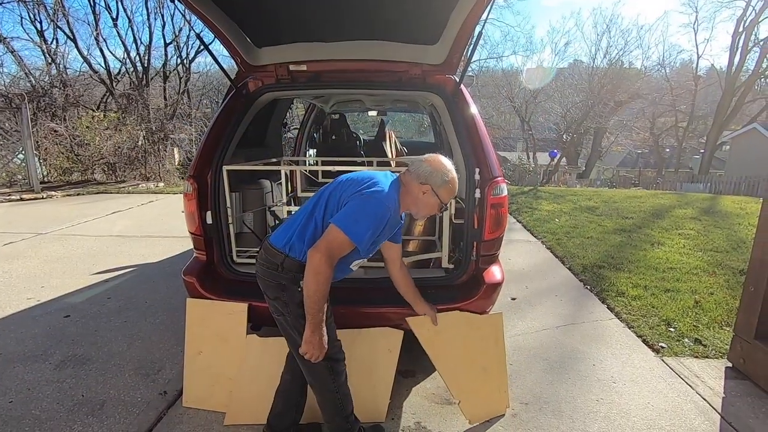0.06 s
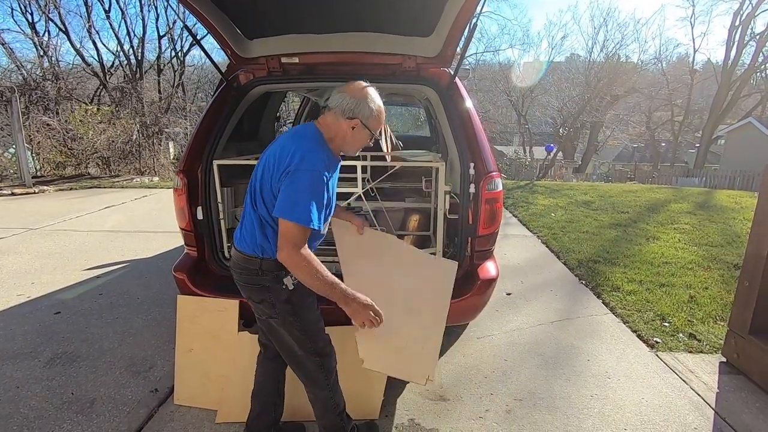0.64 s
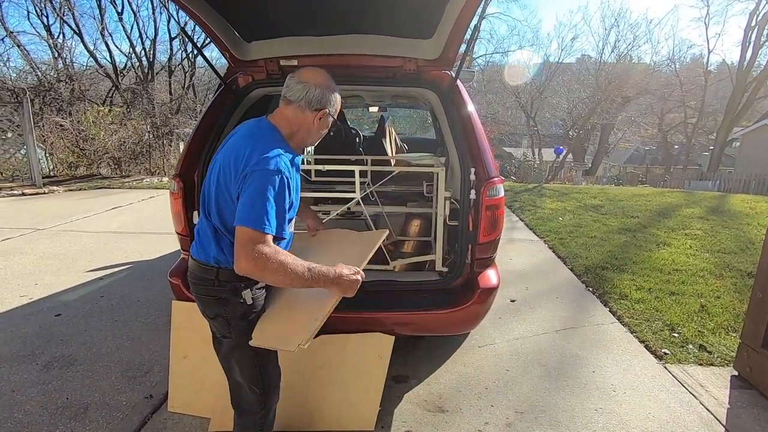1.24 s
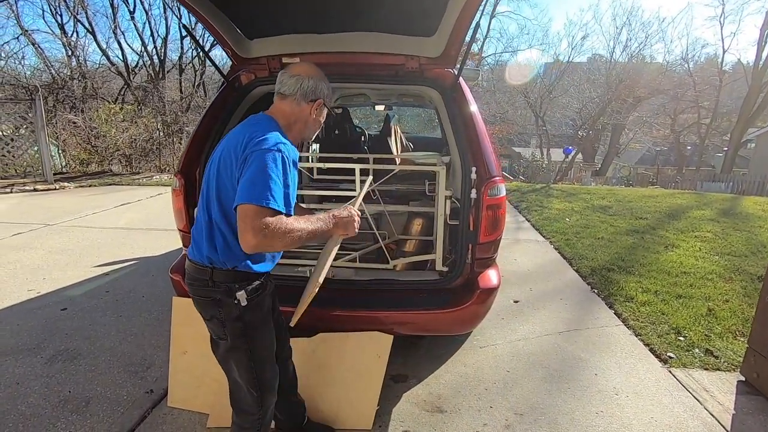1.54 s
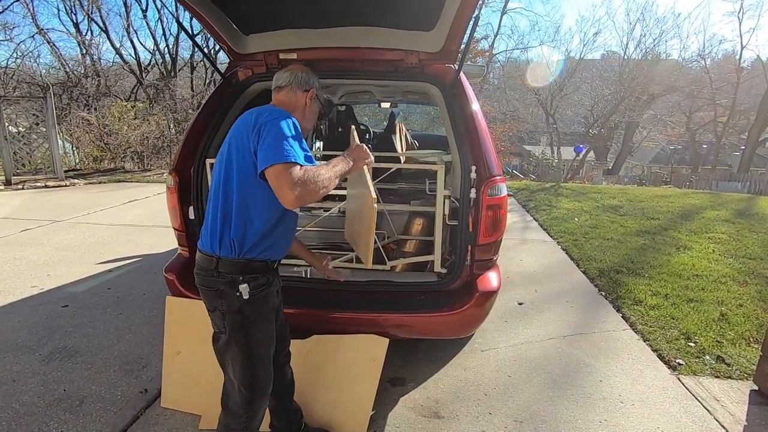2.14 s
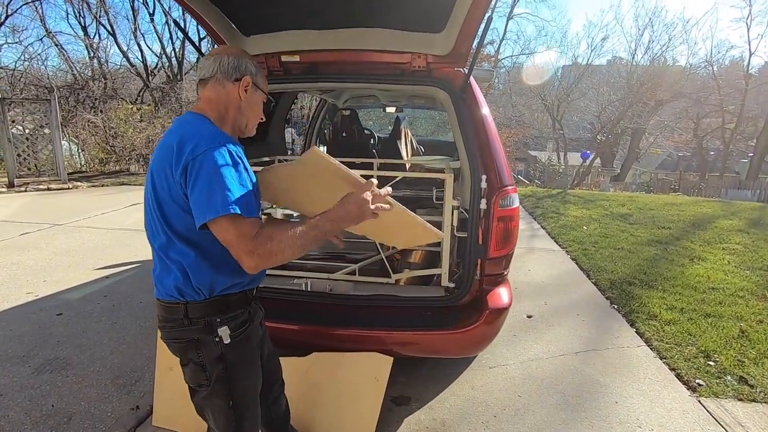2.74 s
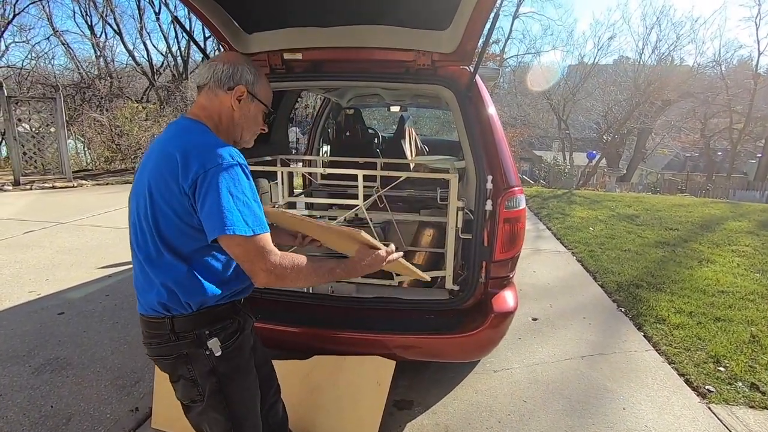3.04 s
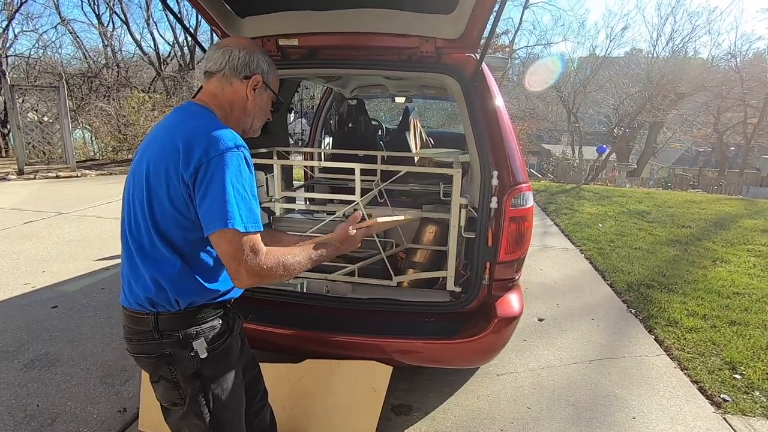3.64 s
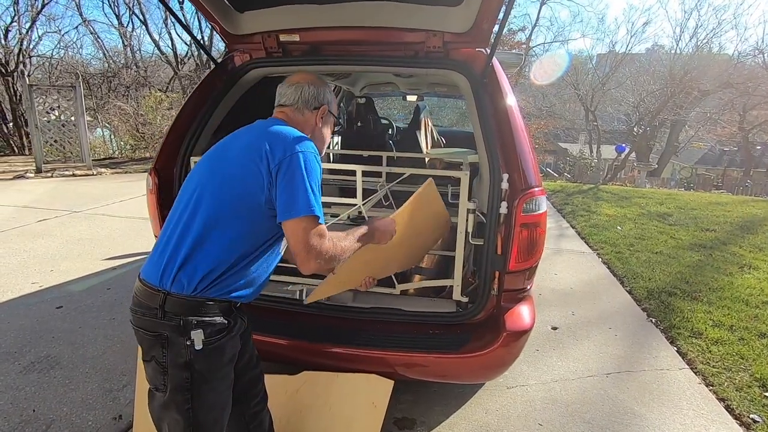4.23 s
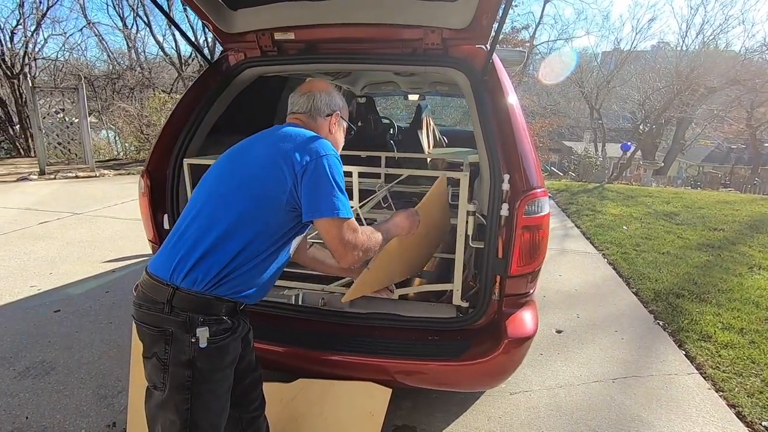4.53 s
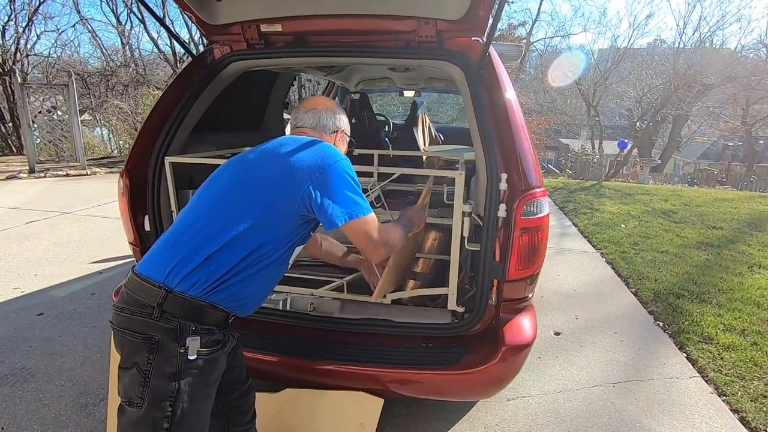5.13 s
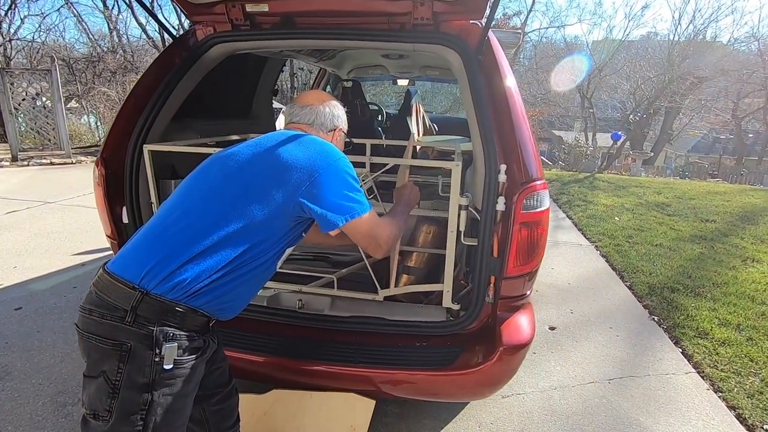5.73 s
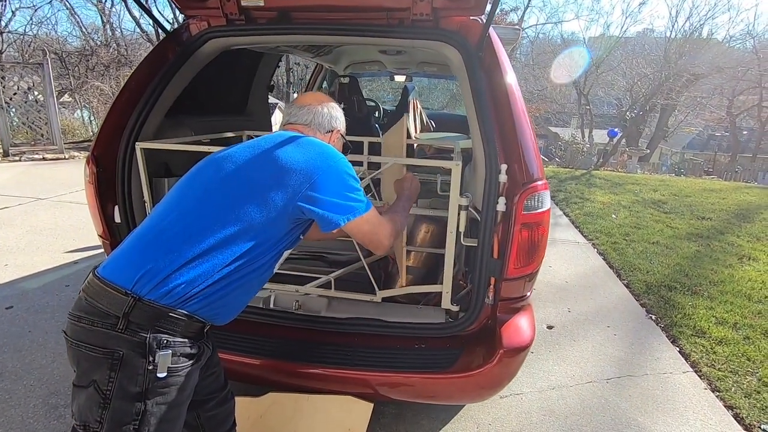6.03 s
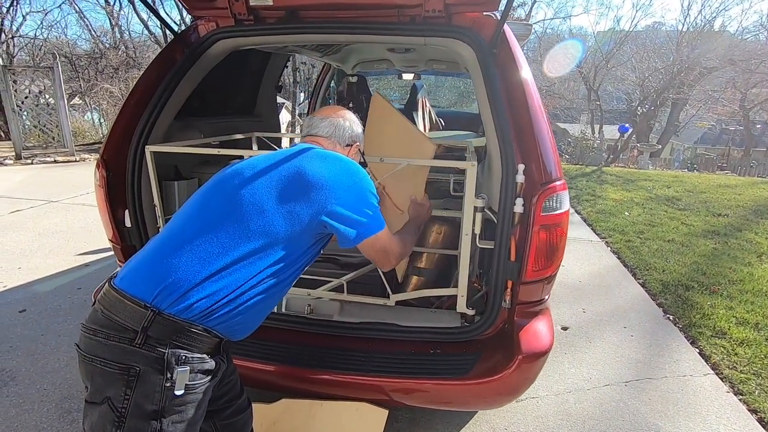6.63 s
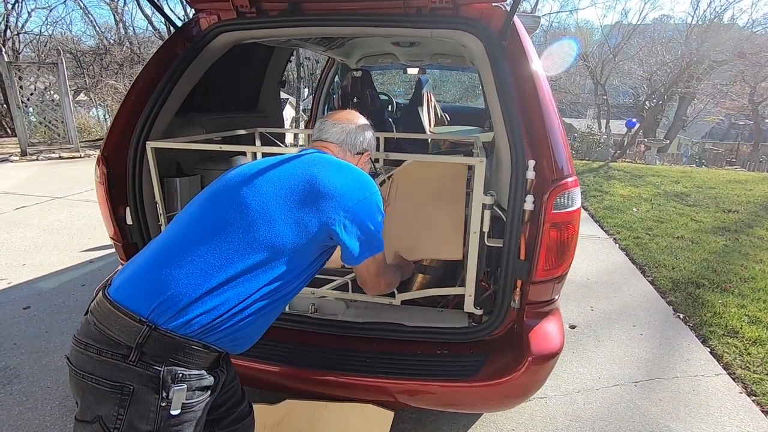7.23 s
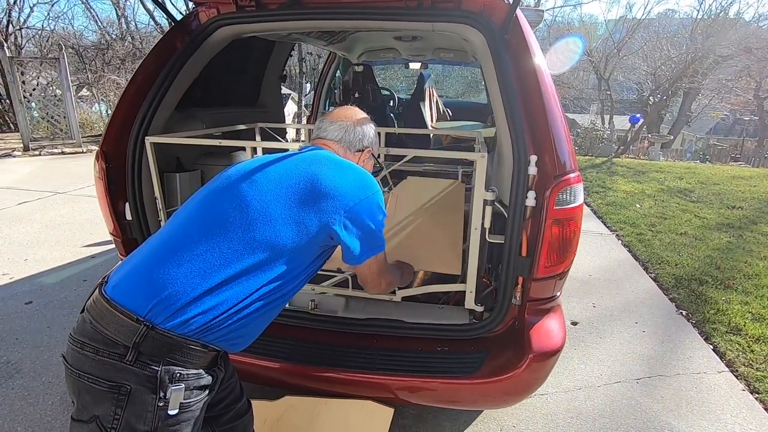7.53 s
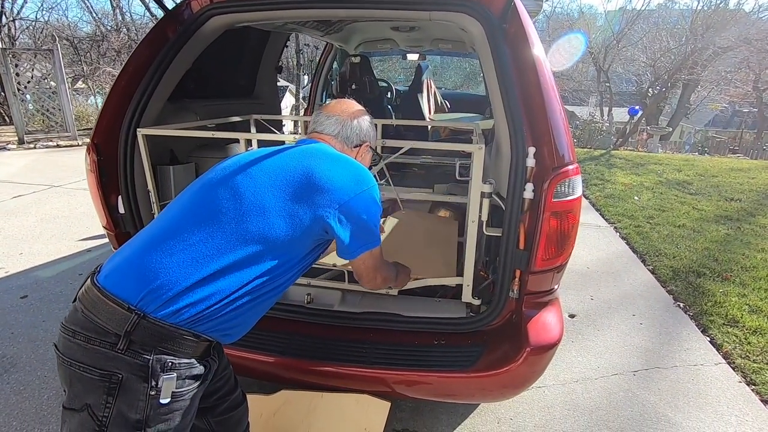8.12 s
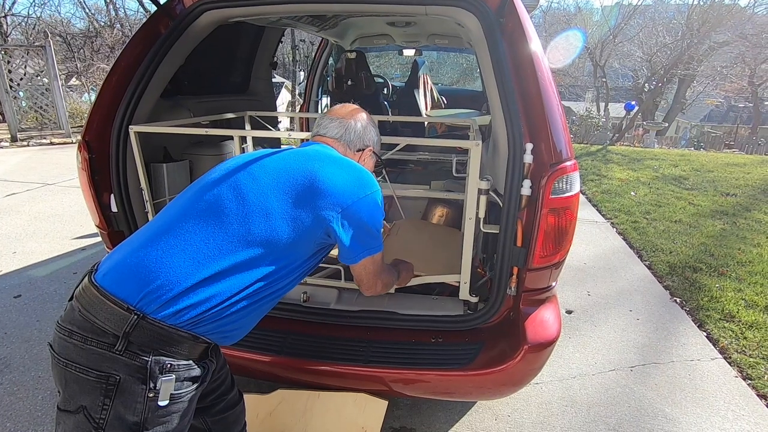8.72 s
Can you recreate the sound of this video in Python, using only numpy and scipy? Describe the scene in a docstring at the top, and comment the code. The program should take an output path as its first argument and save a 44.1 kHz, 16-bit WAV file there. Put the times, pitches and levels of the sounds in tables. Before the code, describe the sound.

On a quiet driveway, a plywood panel is lifted with a few hollow knocks. Palms rub over the wood while shoes scuff and crunch grit on concrete. The panel then goes into the back of a van, thumping with a low boom, squeaking and scraping along a metal rack whose tubes ring briefly. The hardest knocks come near the end. Everything is heard from straight ahead, over a faint outdoor rumble and hush.

```python
"""On a quiet driveway a plywood panel is lifted with a few hollow knocks and turned in the hands:
palms rub over the grain, shoes scuff and crack grit on the concrete. From about 4.6 s it is in the
back of a van, where each thump sets the cargo floor booming. Near 6 s its edge squeaks and judders
on the rack, then scrapes along in pushes while the panel hums and the metal tubes ring. The hardest
knocks land just after 8 s as it goes into place. A low rumble and a far hush lie under it all."""
import sys
import numpy as np
from scipy import signal
from scipy.fft import rfft, irfft, next_fast_len
from scipy.io import wavfile

SR = 44100
rng = np.random.default_rng(int(sys.argv[2]) if len(sys.argv) > 2 else 0)


def master(y):
    """Save y as 16-bit WAV."""
    cut = np.clip(np.atleast_2d(y).T, -1, 1)
    pcm = np.round(cut * 32767)  # scale
    wavfile.write(sys.argv[1], SR, pcm.astype(np.int16))


N = 395577

# knocks on the panel: t/s, chatter decay/s, clack level/dB, clack f/Hz,
# clack flank slope/(dB per octave), thump level/dB, thump f/Hz
KNOCKS = [(.014, 0.0046, -50, 700, 10, -39, 190), (.066, 0.0069, -48, 1700, 4.5, -49.5, 220),
          (0.441, 0.006, -61, 3500, 9, -48, 121), (.484, 0.0024, -70, 1200, 13, -48.5, 192),
          (0.874, 0.022, -54, 2200, 4.5, -48, 217), (1.036, 0.0023, -52, 1200, 6, -40, 224),
          (1.055, 0.0088, -55, 2200, 7, -45.5, 370), (1.613, 0.0016, -72, 1500, 4, -49, 216),
          (3.672, 0.0022, -55.5, 3600, 4.5, -66, 300), (4.689, 0.0046, -52.5, 850, 9.5, -39, 232),
          (4.759, 0.012, -51.5, 750, 10, -47.5, 261), (4.973, 0.013, -60, 1700, 10, -58, 240),
          (6.025, 0.012, -53.5, 900, 3, -38.5, 253), (6.056, 0.029, -51.5, 600, 16, -36, 186),
          (6.446, 0.005, -44.5, 1050, 8.5, -40, 220), (6.465, 0.019, -49.5, 700, 12.5, -39, 180),
          (6.667, 0.0086, -48, 700, 10.5, -48.5, 201), (6.74, 0.0035, -45.5, 1100, 14.5, -50, 221),
          (6.96, 0.0024, -43, 2400, 11, -67.5, 200), (7.051, 0.0039, -44, 3300, 8.5, -59.5, 204),
          (7.531, 0.027, -54, 1000, 2.5, -50, 177), (7.575, 0.015, -56, 1500, 1.5, -50, 239),
          (8.077, 0.00041, -30.5, 1234, 19.5, -33, 170), (8.096, 0.0049, -33, 1200, 11, -32.5, 186),
          (8.384, 0.0017, -34.5, 950, 29, -31, 204), (8.68, 0.006, -49.5, 690, 12.5, -38, 272),
          (8.752, 0.005, -50.5, 700, 9, -37.5, 214), (8.906, 0.011, -53.5, 650, 11.5, -40, 190)]
# modes of the panel resting in the rack: f/Hz, level/dB, t60/s
PANEL_MODES = [(150.2, -1, 0.15), (182.4, -13, 0.47), (242.6, -6.5, 0.36), (288.3, -7.5, 0.48),
               (550, -12.5, 0.11), (617.6, 4.5, 0.22), (766.3, -3, 0.2), (850, -11.5, 0.21),
               (930, -9.5, 0.17), (1059, 3.5, 0.18), (1131.6, 12, 0.1), (1280, 7.5, 0.17), (1450, -6, 0.18),
               (1776, 4, 0.15), (2496, -1, 0.045), (3260, -3.5, 0.12)]
# stereo width of scattered sound: f/Hz, side minus mid/dB
STEREO_WIDTH = [(100, -31.5), (280, -22.5), (400, -14), (700, -6), (1300, -5), (2400, -8.5), (4400, -13),
                (8100, 0.5)]
# spectra of the bass rumble and of the sub-bass below it: f/Hz, level/dB
RUMBLE_COLOUR = [(60, -1), (100, 0.5), (155, 9.5), (240, 2.5), (300, -5), (400, -8.5), (700, -35.5)]
SUB_COLOUR = [(20, -32), (35, -3.5), (55, 11.5), (80, 22), (105, 6.5), (160, -75)]


def panel_response(direct_db=45.0, crack_db=8.5, crack_s=0.001, cabin_db=8.5, cabin_t60=0.48):
    """One tap on the panel: a crack, the cargo space's dull tail, dense vibrations and ringing modes."""
    wood = [(83.6, 4, 0.19), (163, 24, 0.1), (272, 14.5, 0.4), (415, 11.5, 0.73), (750, 15, 0.5),
            (2260, 17, 0.13), (5100, 9, 0.23), (8900, -23.5, 0.13), (13000, -32.5, 0.12)]   # dense short-lived vibrations: f/Hz, level/dB, t60/s
    size = 24000
    t = np.arange(size) / SR
    cabin = lowpass(diffuse(size), hz=6000) * from_db(cabin_db - 60 * t / cabin_t60)
    tap = diffuse(size) * from_db(crack_db) * np.exp(-t / crack_s) + cabin
    tap[:, 0] += from_db(direct_db)
    out = lowpass(tap, hz=2330)   # soft wood rounds the pulse off
    edges_hz = np.geomspace(70, 16000, 14)
    noises = [diffuse(size), diffuse(size)]
    for k, (low, high) in enumerate(zip(edges_hz, edges_hz[1:])):
        hz = np.sqrt(low * high)
        decay = from_db(at_hz(wood, hz) - 60 * t / at_hz(wood, hz, column=2))
        out += band(noises[k % 2], low, high) * decay
    for hz, db, t60 in PANEL_MODES:
        # reflections bring each mode to the two ears slightly out of step
        skew = np.arctan(from_db(at_hz(STEREO_WIDTH, hz))) * rng.choice([-1, 1]) * np.array([[1], [-1]])
        spot_db, grip = rng.normal(0, 0.67), rng.normal(1, .008)   # spot and grip shift each mode
        decay = from_db(db + spot_db - 60 * t / t60)
        out += rng.choice([-1, 1]) * decay * np.sin(2 * np.pi * hz * grip * t + skew)
    return out


def knocks(first_touch_db=9.5, thump_db_per_octave=21.0):
    """A first touch and a dying chatter; where the panel is struck sets the pitch of clack and thump."""
    edges_hz = [60, 125, 210, 325, 530, 900, 1500, 2400, 3800, 6000, 11000]   # band edges for shaping each knock: f/Hz
    scoop = [(260, -1), (415, -3.5), (700, 1), (3000, 0), (8000, -9.5)]   # hollow between thump and clack, softened top: f/Hz, level/dB
    out, t = np.zeros((2, N)), np.arange(24000) / SR
    spots = [panel_response() for _ in range(4)]
    blows = []
    for k, (_, chatter_s, *_) in enumerate(KNOCKS):
        age = t / chatter_s
        force = grains(per_s=2500, spread_db=6.56, size=len(t)) * np.exp(-age) * np.minimum(2 * age, 1)
        force[0] += from_db(first_touch_db)
        blows.append(through(force, spots[k % 4]))
    attack = int(.04 * SR)
    for low, high in zip(edges_hz, edges_hz[1:]):
        hz = np.sqrt(low * high)
        parts = band(np.array(blows), low, high, order=3)
        for part, (s, _, clack_db, clack_hz, slope, thump_db, thump_hz) in zip(parts, KNOCKS):
            clack = from_db(clack_db + bell(hz, clack_hz, slope))
            thump = from_db(thump_db + bell(hz, thump_hz, thump_db_per_octave))
            gain = np.hypot(clack, thump) * from_db(at_hz(scoop, hz))
            add(out, s, gain * part / part[:, :attack].std())
    return out


def floor_boom(in_van_s=4.6, swell_s=0.094, boom_db=-10.0, deep_db=-17.5):
    """The van's floor takes up each thump, swells and booms on at the panel's four lowest modes."""
    t, power = np.arange(0, N, 16) / SR, 0
    for s, *_, thump_db, _ in KNOCKS:
        if s > in_van_s:
            age = np.maximum(t - s, 0) / swell_s
            power += (from_db(thump_db) * age * np.exp(1 - age)) ** 2
    shake = colour(diffuse(N), RUMBLE_COLOUR)
    hollow = sum(rms_one(resonate(shake, hz, width_hz=14)) for hz, *_ in PANEL_MODES[:4])
    boom = from_db(boom_db) * rms_one(hollow) + from_db(deep_db) * noise_bed(SUB_COLOUR)
    return np.interp(np.arange(N) / SR, t, np.sqrt(power)) * boom


def ringing_tones(jitter=0.0065, sway=0.011, rough_db=5.0):
    """Single resonances swell and ring out: the panel's hollow hum, edge squeals, a ping from the rack."""
    tones = [(4.785, 0.058, 0.084, 279.2, -46), (6.042, 0.0062, .025, 274, -34),
             (6.748, 0.023, 0.016, 622, -39), (7.065, 0.003, 0.012, 1560, -41),
             (7.63, 0.018, 0.085, 300, -49.5), (8.245, .06, 0.033, 286.4, -38.5),
             (8.34, 0.098, 0.041, 1720, -54), (8.445, 0.019, 0.03, 285, -33), (8.555, .03, 0.054, 288, -43)]   # peak t/s, swell/s, ring-out/s, f/Hz, level/dB
    out, t = np.zeros(N), np.arange(N) / SR
    wavering_time = np.cumsum(1 + jitter * drift(150) + sway * drift(14)) / SR
    for s, swell_s, ring_s, hz, db in tones:
        near = (t > s - 3 * swell_s) & (t < s + 7 * ring_s)
        age = t[near] - s
        envelope = np.exp(-np.where(age < 0, (age / swell_s) ** 2, age / ring_s))
        out[near] += from_db(db) * envelope * np.sqrt(2) * np.sin(2 * np.pi * hz * wavering_time[near])
    return out * from_db(rough_db * np.tanh(drift(110)))


def edge_judder(slip_hz=60.1, wander=0.011, ring_s=0.0045, gain_db=2.5):
    """The edge sticks and slips on a rail, almost regularly, shaking the rack into a low groan."""
    pushes = [(6.14, 0.14, -43)]   # t/s, length/s, relative level/dB
    groan_colour = [(40, -27), (62, -9), (124, -11.5), (186, 14.5), (248, -13), (310, -3.5), (440, -29),
                    (900, -40)]   # f/Hz, level/dB
    turns = np.cumsum(slip_hz * (1 + wander * drift(30.4))) / SR
    slips = np.diff(np.floor(turns), prepend=0) * from_db(2.0 * drift(40))
    t = np.arange(4096) / SR
    modes = sum(from_db(db) * np.sin(2 * np.pi * hz * t) for hz, db, _ in PANEL_MODES)
    groan = signal.fftconvolve(slips, modes * np.exp(-t / ring_s))[:N]
    push = strokes(pushes, attack_share=0.092, sag_db_per_s=2.0, release_s=0.081)
    return from_db(gain_db) * push * rms_one(colour(groan, groan_colour))


def edge_scrape():
    """Splinters chatter along the rail and keep the panel's modes ringing."""
    pushes = [(6.22, 0.29, -64.5), (6.55, 0.2, -55.5), (6.69, 0.042, -49), (6.735, 0.021, -54),
              (7.53, 0.067, -53), (7.72, 0.048, -59.5), (8.07, 0.41, -50.5), (8.66, 0.51, -65.5)]   # shoves along the rack: t/s, length/s, level/dB
    scrape_colour = [(100, 2.5), (300, -8), (620, -0.5), (1200, -12.5), (2400, -4), (4000, -14),
                     (8000, -20), (14000, -18)]   # f/Hz, level/dB
    force = grains(per_s=1800, spread_db=0.99, size=N) * stick_slip(per_s=70, depth_db=16.5)
    push = strokes(pushes, attack_share=0.11, sag_db_per_s=10.5, release_s=0.035)
    return push * rms_one(colour(through(force, panel_response()), scrape_colour))


def dry_rasps():
    """Bursts of tiny slips, from the panel or a sole on grit: dry, bright rasps."""
    rasps = [(0.069, 0.004, 2600, 0.65, -43.5), (2.56, 0.12, 3000, 0.31, -60),
             (5.401, 0.0017, 2440, 0.92, -38), (5.417, 0.0045, 2480, 1.3, -37.5),
             (5.465, 0.0098, 2130, 0.81, -42.5), (5.483, 0.002, 2280, 0.78, -40),
             (5.53, 0.0017, 2670, 1.3, -40.5), (6.763, .008, 2420, 0.56, -48),
             (6.964, 0.0029, 2900, 0.55, -34.5), (7.054, 0.0079, 3700, 0.86, -34.5),
             (8.103, 0.0052, 2580, 1.2, -39.5), (8.385, 0.0035, 1920, 0.41, -37.5)]   # peak t/s, half length/s, centre f/Hz, width/octaves, level/dB
    out, t = np.zeros((2, N)), np.arange(36000) / SR
    for s, half_s, hz, octaves, db in rasps:
        lead_s = 3 * half_s
        force = grains(per_s=6000, spread_db=3.6, size=len(t)) * np.exp(-((t - lead_s) / half_s) ** 2)
        slips = through(force, driveway_response(echo_db=-30.0, t60=0.18))
        band_ratio = 2 ** (octaves / 2)
        rasp = band(slips, hz / band_ratio, hz * band_ratio)
        burst_rms = np.sqrt(np.sum(rasp[0] ** 2) / (2 * half_s * SR))
        add(out, s - lead_s, from_db(db) * rasp / burst_rms)
    return out


def edge_squeaks(half_s=0.008, width_hz=140.0):
    """The edge slips on a tube in a short burst that rings two shrill resonances."""
    squeaks = [(6.064, -56), (6.097, -58)]   # peak t/s, level/dB
    shrill_hz = [3040, 3850]   # resonances: f/Hz
    out, t = np.zeros((2, N)), np.arange(12000) / SR
    for s, db in squeaks:
        force = grains(per_s=6000, spread_db=2, size=len(t)) * np.exp(-(t / half_s - 2) ** 2)
        slips = through(force, driveway_response(t60=0.24))
        squeak = sum(rms_one(resonate(slips, hz, width_hz)) for hz in shrill_hz)
        add(out, s - 2 * half_s, from_db(db) * squeak / squeak[:, :SR // 20].std())
    return out


def rack_rings():
    """The panel strikes the rack's metal tubes; they ring on, a little out of step at the two ears."""
    hits = [(6.961, -51), (7.052, -58), (8.095, -57)]   # t/s, level/dB
    tube_modes = [(2430, -12.5, .35), (2780, -8.5, 0.47), (3610, 10, 0.1), (4250, -0.5, 0.13)]   # f/Hz, relative level/dB, t60/s
    out, t = np.zeros((2, N)), np.arange(22000) / SR
    for s, hit_db in hits:
        for hz, db, t60 in tube_modes:
            decay = rng.choice([-1, 1]) * from_db(hit_db + db - 60 * t / t60)
            ear_phase = rng.normal(0, 0.39, (2, 1))
            add(out, s, decay * np.sin(2 * np.pi * hz * t + ear_phase))
    return out


def palm_rubs(face_db=1.0, face_width_hz=32.0):
    """Skin catches on the grain in uneven clumps; the face's resonances come and go as hands travel."""
    rubs = [(0.99, 0.1, -51), (1.03, 0.067, -49.5), (1.11, 0.21, -55), (1.32, 0.21, -62), (1.71, 0.06, -66),
            (2.15, 0.096, -68), (2.31, 0.078, -61), (2.38, 0.41, -56), (2.595, 0.041, -50.5),
            (2.76, 0.057, -49.5), (2.84, 0.11, -62), (3.03, 0.2, -58), (3.34, 0.23, -60),
            (3.71, 0.094, -53.5), (3.87, 0.18, -62), (4.44, 0.063, -64)]   # strokes of palms and sleeves: t/s, length/s, level/dB
    face_hz = [639, 777, 1420, 1567, 1730, 1953, 2450, 2973]   # resonances of the hand-held panel: f/Hz
    rub_colour = [(200, -14), (600, -4), (1100, -6), (2000, -4), (2900, 0), (3600, -2.5), (4200, -8),
                  (8000, -27.5), (14000, -45.5)]   # f/Hz, level/dB
    force = grains(per_s=2200, spread_db=2.2, size=N) * from_db(2.6 * drift(35))
    touch = through(force, driveway_response())
    face = sum(resonate(touch, hz, face_width_hz) * from_db(3.7 * drift(10)) for hz in face_hz)
    hands = strokes(rubs, attack_share=0.31, sag_db_per_s=3.0, release_s=0.039)
    return hands * rms_one(colour(touch + from_db(face_db) * face, rub_colour))


def shoe_scuffs(crack_db=-1.0):
    """Soles crush clumps of sand on the concrete; now and then a larger grain cracks."""
    scuffs = [(0.875, 0.014, -57.5), (1.02, 0.36, -84), (2.55, 0.3, -65), (3.09, 0.16, -66),
              (3.27, 0.049, -60.5), (3.38, 0.22, -61), (3.71, 0.1, -52), (3.85, 0.44, -77),
              (4.887, 0.02, -52), (4.925, 0.071, -58.5), (5.08, 0.024, -64), (5.335, 0.14, -49.5),
              (5.39, 0.064, -47.5), (5.75, 0.026, -64), (6.35, 0.031, -63), (7.225, 0.031, -68.5),
              (7.74, 0.024, -77)]   # t/s, length/s, level/dB
    cracks = [(4.894, -30), (5.0866, -30.5), (5.319, -38.5), (5.347, -29), (5.417, -24.5), (5.481, -25.5),
              (5.528, -31)]   # single grains: t/s, relative peak level/dB
    grit_colour = [(200, 1.5), (600, -12.5), (1200, -3.5), (2100, 1), (4200, -1.5), (6500, -10.5),
                   (10000, -15.5), (11500, -26), (15000, -34)]   # f/Hz, level/dB
    click = np.pad(driveway_response(echo_db=-26.0), ((0, 0), (32, 0)))
    crunch = colour(click, grit_colour)
    force = grains(per_s=3500, spread_db=3.5, size=N) * stick_slip(per_s=100, depth_db=12)
    soles = strokes(scuffs, attack_share=0.15, sag_db_per_s=-20.0, release_s=0.05)   # scuffs build
    out = soles * rms_one(through(force, crunch))
    for s, db in cracks:
        add(out, s, from_db(db + crack_db) * crunch / np.abs(crunch).max())
    return out


def driveway_response(echo_db=-30.5, t60=0.25, right_lag_samples=0.55, size=9000):
    """A direct click, a touch later on the right, then scatter off the van and the ground."""
    out = diffuse(size) * from_db(echo_db - 60 * np.arange(size) / SR / t60)
    out[:, :2] += [[1, 0], [1 - right_lag_samples, right_lag_samples]]
    return out


def outdoor_ambience(rumble_db=4.0, sub_db=5.5, gust_db=3.5, hush_db=-66, fade_db_per_s=0.5):
    """Uneven low rumble under the slowly fading hush of the neighbourhood."""
    lows = [(0.0, -59, -58.5), (1.17, -59.5, -60), (2.91, -61, -75), (4.27, -64.5, -74),
            (4.75, -65.5, -60.5), (5.9, -66, -93)]   # t/s, relative bass level/dB, relative sub-bass level/dB
    hush_colour = [(200, -19), (420, -10), (800, 0.5), (1000, -3), (1600, -5), (2600, -18), (4800, -24),
                   (8000, -38.5), (10500, -38.5), (12000, -53)]   # f/Hz, level/dB
    t = np.arange(N) / SR
    rumble = from_db(rumble_db) * level(lows, column=1) * noise_bed(RUMBLE_COLOUR)
    sub = from_db(sub_db + gust_db * drift(7.7)) * level(lows, column=2) * noise_bed(SUB_COLOUR)
    hush = from_db(hush_db - fade_db_per_s * t + drift(5)) * noise_bed(hush_colour)
    return rumble + sub + hush


def grains(per_s, spread_db, size):
    """Tiny slips at random moments, a few stronger than the rest."""
    born = rng.random(size) < per_s / SR
    strength = np.minimum(rng.exponential(1, size), 4)
    return born * from_db(spread_db * strength) * rng.choice([-1, 1], size)


def stick_slip(per_s, depth_db):
    """Gain over time: the contact lets go suddenly and grips again, at an uneven pace."""
    turns = np.cumsum(per_s * np.exp(.5 * drift(per_s))) / SR
    return from_db(depth_db * (.5 - turns % 1))


def strokes(rows, attack_share, sag_db_per_s, release_s):
    """Gain over time: each stroke gathers speed, sags and dies away; overlaps add in power."""
    t, power = np.arange(0, N, 16) / SR, 0
    for start, length, db in rows:
        age = np.maximum(t - start, 0)
        rise = np.minimum(age / (attack_share * length), 1)
        body = from_db(db - sag_db_per_s * (np.minimum(age, length) - length / 2))
        fall = np.exp(-np.maximum(age - length, 0) / release_s)
        power += (rise * body * fall) ** 2
    return np.interp(np.arange(N) / SR, t, np.sqrt(power))


def drift(per_s):
    """A random wobble of unit power, with so many turning points a second."""
    knots = rng.standard_normal(int(N / SR * per_s) + 3)
    return rms_one(np.interp(np.arange(N) / SR * per_s, np.arange(len(knots)), knots))


def diffuse(size):
    """Broadband stereo noise, narrow in the bass and wide in the treble."""
    padded = next_fast_len(size, real=True)
    mid, side = rfft(rng.standard_normal((2, size)), padded)
    width = from_db(at_hz(STEREO_WIDTH, np.linspace(0, SR / 2, len(mid))))
    return rms_one(irfft(mid + width * side * [[1], [-1]], padded)[:, :size])


def noise_bed(points):
    """Scene-long coloured stereo noise of unit power."""
    return rms_one(colour(diffuse(N), points))


def colour(x, points):
    """Equalise along a curve of (f/Hz, level/dB) that rolls off above the last point."""
    size = next_fast_len(x.shape[-1] + 2048, real=True)
    hz = np.fft.rfftfreq(size, 1 / SR)
    gain = from_db(at_hz(points, hz)) / np.maximum(hz / points[-1][0], 1) ** 3
    return irfft(rfft(x, size) * gain, size)[..., :x.shape[-1]]


def resonate(x, hz, width_hz):
    """One resonance with unit gain at its peak."""
    r = np.exp(-np.pi * width_hz / SR)
    feedback = [1, -2 * r * np.cos(2 * np.pi * hz / SR), r * r]
    return signal.lfilter(np.array([1, 0, -1]) * (1 - r * r) / 2, feedback, x + 1e-18)


def band(x, low, high, order=2):
    """Band-pass between two edges in Hz."""
    return signal.sosfilt(signal.butter(order, [low, high], "band", fs=SR, output="sos"), x + 1e-18)


def lowpass(x, hz):
    """Gentle treble roll-off."""
    return signal.sosfilt(signal.butter(2, hz, fs=SR, output="sos"), x)


def bell(hz, centre_hz, db_per_octave, knee=0.74):
    """A rounded peak in dB with straight falling flanks."""
    return -db_per_octave * (np.hypot(np.log2(hz / centre_hz), knee) - knee)


def through(force, response):
    """A force drives a stereo impulse response."""
    return signal.oaconvolve(force[None], response, axes=1)[:, :len(force)]


def add(out, s, sound):
    """Mix a sound in at s seconds."""
    start = max(0, int(s * SR))
    part = out[:, start:start + sound.shape[-1]]
    part += sound[..., :part.shape[-1]]


def level(rows, column):
    """Gain over time from rows of t/s and levels/dB."""
    rows = np.array(rows)
    return from_db(np.interp(np.arange(N) / SR, rows[:, 0], rows[:, column]))


def at_hz(points, hz, column=1):
    """Read a table on a log-frequency axis."""
    points = np.array(points)
    return np.interp(np.log(np.maximum(hz, 1)), np.log(points[:, 0]), points[:, column])


def from_db(db):
    """Decibels to gain."""
    return 10 ** (np.asarray(db) / 20)


def rms_one(x):
    """Scale to unit power."""
    return x / np.sqrt(np.mean(x ** 2) + 1e-20)


def scene():
    """The work happens almost straight ahead, over the outdoor ambience."""
    work = knocks() + rack_rings() + dry_rasps() + floor_boom() + edge_judder() + edge_scrape()
    work += ringing_tones() + edge_squeaks() + palm_rubs() + shoe_scuffs()
    return work + outdoor_ambience()


def record(dry, cutoff_hz=15000):
    """A steep low-pass takes off the very top."""
    return signal.sosfilt(signal.ellip(10, .1, 80, cutoff_hz, fs=SR, output="sos"), dry)


dry = scene()
out = record(dry)
master(out)
```